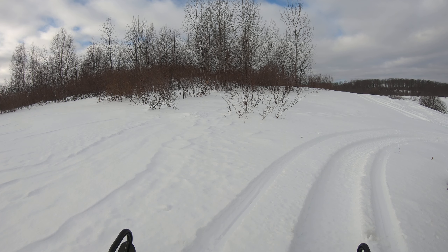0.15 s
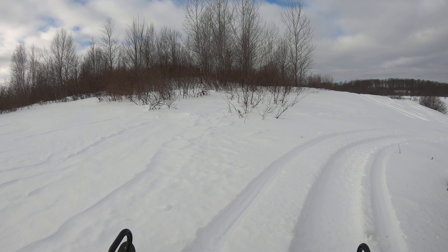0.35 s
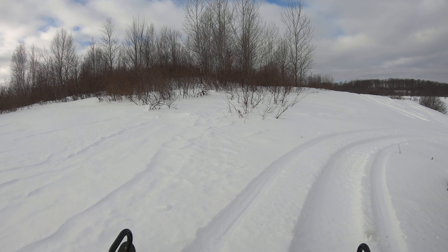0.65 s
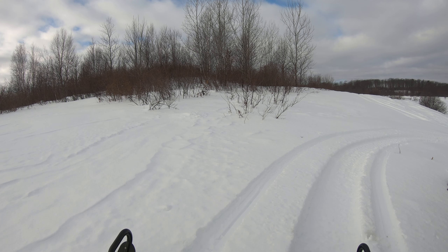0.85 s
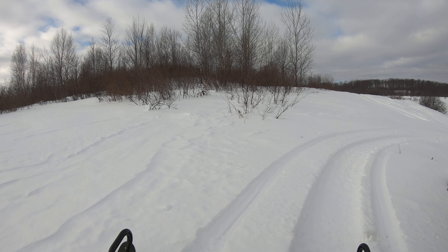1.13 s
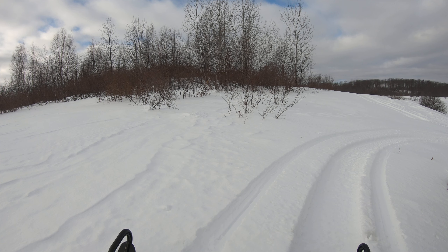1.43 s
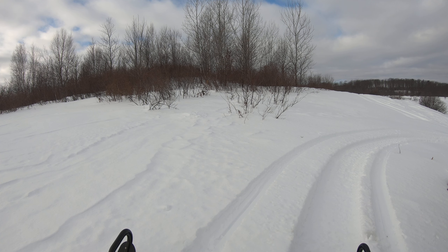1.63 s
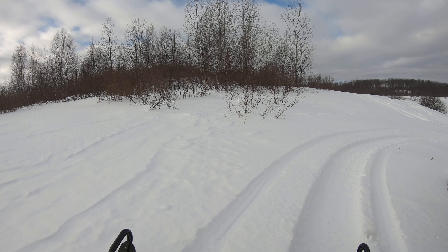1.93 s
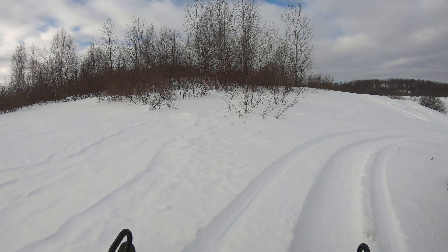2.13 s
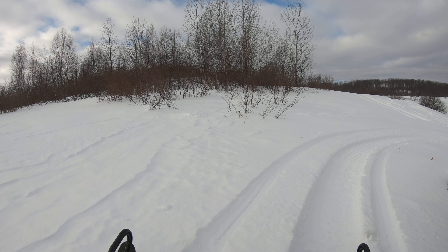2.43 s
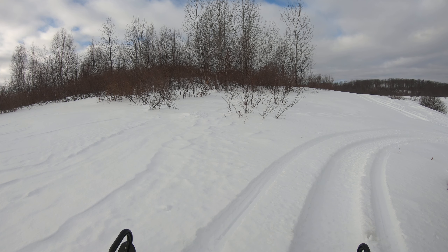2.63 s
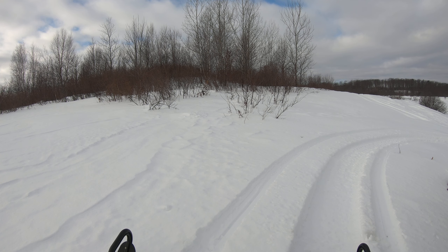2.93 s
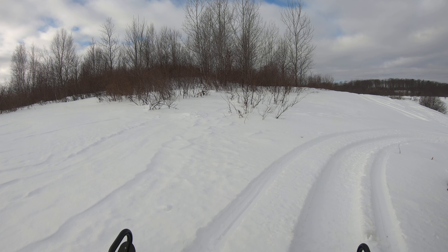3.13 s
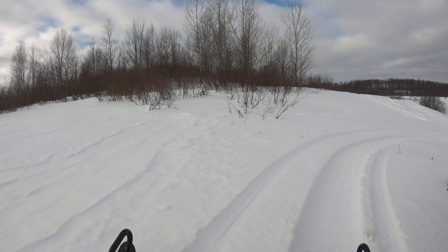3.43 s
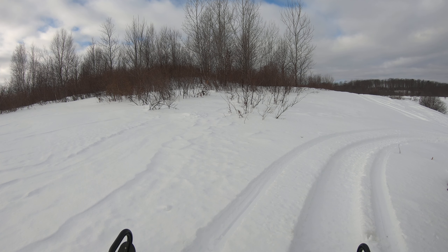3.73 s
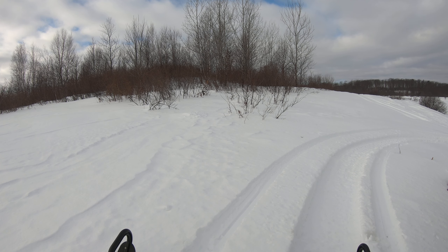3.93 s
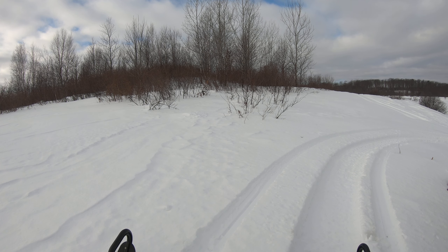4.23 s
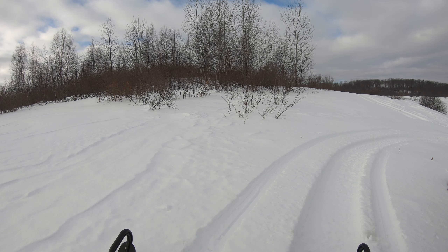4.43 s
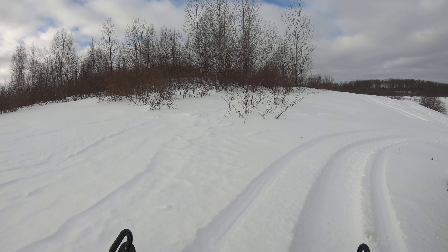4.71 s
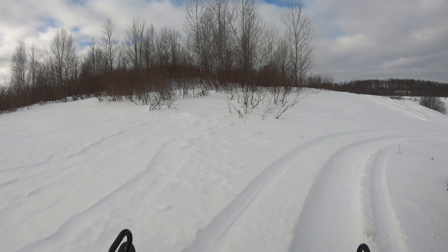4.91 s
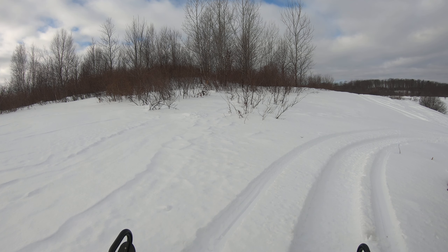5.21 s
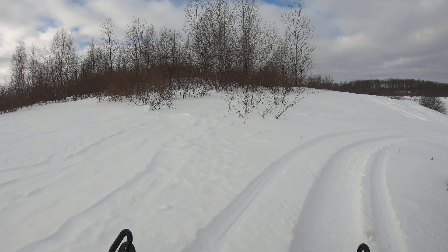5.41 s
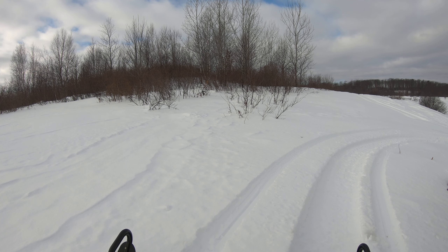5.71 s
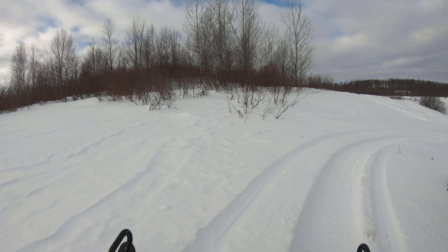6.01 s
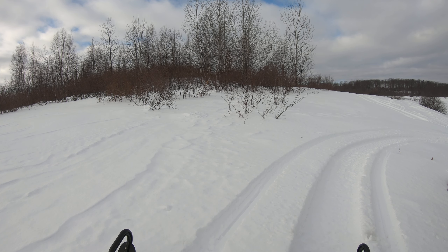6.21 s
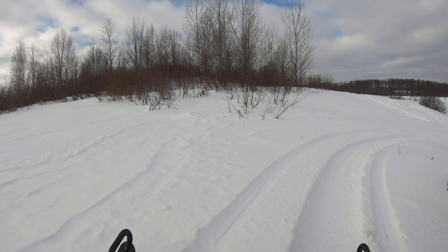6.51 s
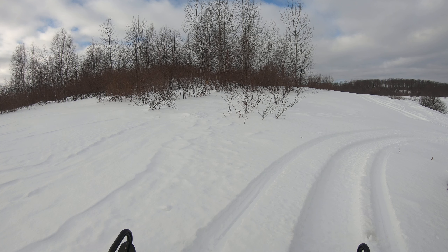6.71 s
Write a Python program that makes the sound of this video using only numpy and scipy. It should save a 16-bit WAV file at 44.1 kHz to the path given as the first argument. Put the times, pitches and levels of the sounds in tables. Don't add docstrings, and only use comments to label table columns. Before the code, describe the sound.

A snowmobile stands idling outdoors on snow, heard from just behind its hood. A low, fast throb pumps continuously, with irregular exhaust booms and a hollow ringing from the silencer. Loose clutch metal knocks and chatters over it, harder at random moments, with tiny bright ticks and soft fan hiss. The speed barely wavers and nothing else happens. The sound is close, dry and slightly muffled.

```python
import sys
import numpy as np
from scipy import signal
from scipy.fft import rfft, irfft
from scipy.io import wavfile
from scipy.ndimage import uniform_filter1d

SR = 44100
rng = np.random.default_rng(int(sys.argv[2]) if len(sys.argv) > 2 else 0)


def master(y):
    cut = np.clip(np.atleast_2d(y).T, -1, 1)
    pcm = np.round(cut * 32767)
    wavfile.write(sys.argv[1], SR, pcm.astype(np.int16))


def elevation(decibels):
    levels = np.asarray(decibels, float)
    return 10 ** (levels / 20)


N = 302570


def level(x, db):
    return x * elevation(db) / np.sqrt(np.mean(x ** 2))


def colour(x, points):
    hz, db = np.transpose(points)
    grid = np.fft.rfftfreq(2048, 1 / SR)
    fall_above = -30 * np.log2(np.maximum(grid / hz[-1], 1))
    fall_below = -12 * np.log2(np.maximum(hz[0] / (grid + 1), 1))
    gain_db = np.interp(np.log(grid + 1), np.log(hz), db) + fall_above + fall_below
    cepstrum = irfft(gain_db * np.log(10) / 20)
    cepstrum[1:1024] *= 2
    cepstrum[1025:] = 0
    return signal.fftconvolve(x, irfft(np.exp(rfft(cepstrum))))[:N]


def ring(x, hz, width_hz):
    return signal.lfilter(*signal.iirpeak(hz, hz / width_hz, fs=SR), x)


def clicks(times_s, sizes):
    out = np.zeros(N)
    inside = (times_s >= 0) & (times_s < (N - 1) / SR)
    np.add.at(out, (times_s[inside] * SR).astype(int), sizes[inside])
    return out


def decaying(impulses, decay_ms):
    return signal.lfilter([1], [1, -np.exp(-1000 / (decay_ms * SR))], impulses)


def bursts(impulses, decay_ms, tail):
    scrape = decaying(impulses, decay_ms) * rng.standard_normal(N)
    return np.roll(impulses, int(.001 * SR)) + tail * scrape


def hump(turn, centre, width):
    away = (turn - centre + .5) % 1 - .5
    return np.exp(-.5 * (away / width) ** 2)


PUMP = [(0.178, 0.049, 0.048), (0.273, 0.033, 0.55), (0.357, 0.02, 0.19), (0.397, 0.013, 0.11),
        (0.482, 0.05, 0.37)]


def pumping(turn):
    steps = np.repeat(rng.standard_normal((2, N // 500 + 1)), 500, axis=1)
    wobble = uniform_filter1d(steps, 500)[:, :N]
    angle = turn + .0071 * wobble[0]
    dips = 0
    for at, width, depth in PUMP:
        dips = dips + depth * (hump(angle, at, width) + hump(angle, at + .5, width))
    return (dips.mean() - dips) * (1 + .06 * wobble[1]) * elevation(1.47)


def ignition(turn, ports_s):
    charge = rng.random(len(ports_s)) ** 1.4
    knock_s, knock_db = np.transpose(KNOCKS)
    knock_turn = np.round(np.interp(knock_s, np.arange(N) / SR, turn)).astype(int)
    before = (2 * knock_turn - 1)[knock_db > -24.5]
    charge[before] = .7 + .3 * charge[before]
    charge = signal.lfilter([1, 0, -.3, 0, -.2], [1], charge)
    return (charge - charge.mean()) / charge.std()


# (delay [ms], width [ms], pressure [linear])
BOOM = [(2.8, .8, 1.0), (5.5, .8, -1.7), (10.1, 1.0, 1.6), (15.0, 1.5, -.8), (18.9, .7, .8),
        (23.8, 1.4, -.2), (32.5, 1.5, .3)]
# (frequency [Hz], width [Hz], level [dB])
CHAMBERS = [(277, 12, -2), (373.3, 21.4, 11.5), (473, 73, -6), (579, 48, -1), (681.4, 15, -2.5),
            (720, 45, -9), (841, 31, -4), (909, 54, -16.5), (1003, 28, -15)]


def exhaust(ports_s, charge):
    ms = np.arange(1800) / SR * 1000
    pipe = sum(p * np.exp(-.5 * ((ms - delay) / width) ** 2) for delay, width, p in BOOM)
    late_s = ports_s + .00018 * rng.standard_normal(len(ports_s))
    boom = signal.fftconvolve(clicks(late_s, charge), pipe)[:N] * elevation(-20)
    cylinder = (-1) ** np.arange(len(ports_s))
    puffs = clicks(late_s + .003976, .97 + .14 * charge + 1.8 * cylinder)
    puffs = bursts(puffs, decay_ms=6.8, tail=.023)
    chambers = 0
    for k, (hz, width_hz, db) in enumerate(CHAMBERS):
        chambers = chambers + (-1) ** k * elevation(db) * ring(ring(puffs, hz, width_hz), hz, 3 * width_hz)
    return boom + level(chambers, -31.5)


# (frequency [Hz], density [dB per Hz])
GAS = [(30, -5), (60, 2.5), (130, -15.5), (230, -3), (330, -3.5), (450, -8.5), (760, -14), (980, -20.5),
       (1150, -23), (1600, -25.5), (2200, -32), (4000, -61.5), (8000, -58.5)]


def gas(turn):
    near = .5 * hump(turn, .28, .08) + .2 * hump(turn, .03, .07)
    far = .4 * hump(turn, .8, .06) + .15 * hump(turn, .6, .04)
    gate = .6 + near + far
    return level(colour(gate * rng.standard_normal(N), GAS), -26.5)


# (time [s], peak level [dB])
KNOCKS = [(0.0882, -22), (0.3666, -23), (0.5846, -21), (0.7068, -23), (1.0156, -20), (1.046, -22),
          (1.1692, -22), (1.2905, -20), (1.3813, -24), (1.5983, -19), (1.6896, -21), (1.7609, -24),
          (1.7804, -21), (1.8113, -23), (1.9959, -22), (2.2697, -21), (2.6329, -24), (2.7247, -21),
          (2.9387, -22), (3.2131, -21), (3.3972, -24), (3.5209, -23), (3.5523, -24), (3.7364, -21),
          (3.8566, -22), (4.4623, -24), (4.588, -20), (4.9232, -24), (5.0484, -24), (5.9933, -24)]
# (time [s], rattle level [dB], crank angle of the knock [turns])
LOOSE = [(0.0, -42, -.15), (2.4, -43, -.07), (3.6, -42, -.13), (4.2, -44.5, -.12), (4.8, -42.5, -.15),
         (5.7, -44, -.16), (6.3, -43.5, -.25), (6.86, -41, -0.23)]


def knocks(turn_s, charge):
    when, loose_db, angle = np.transpose(LOOSE)
    hard_s, hard_db = np.transpose(KNOCKS)
    chance = rng.standard_normal((len(turn_s), 3))
    push = np.minimum(np.r_[0, charge[1::2], 0][:len(turn_s)], 1.6)
    play_db = np.interp(turn_s, when, loose_db - loose_db.mean())
    firm_s = turn_s + np.interp(turn_s, when, angle) / SPEED[0][1] + .0022 * chance[:, 0]
    firm_db = -30.5 + 4.0 * push + play_db
    free = np.abs(firm_s[:, None] - hard_s).min(axis=1) > .007
    back_s = turn_s + .0068 + .0016 * chance[:, 2]
    back_db = -31.5 + 2.6 * np.minimum(chance[:, 1], 1.2) + play_db
    times_s = np.r_[hard_s, firm_s[free], back_s]
    return times_s, np.r_[hard_db + 2.5, firm_db[free], back_db]


# (frequency [Hz], density [dB per Hz])
COWL = [(600, -20.5), (1100, -4), (1600, 0), (2300, -8.5), (2800, -4.5), (3110, -6.5), (3600, -7.5),
        (4000, -14), (4400, -11), (5100, -23), (6000, -34), (7600, -30.5), (9500, -51.5), (11500, -62.5)]


def rattle(turn, turn_s, blows):
    blow_s, blow_db = blows
    hard = bursts(clicks(blow_s + .0003, elevation(blow_db + 30.5)), decay_ms=1.8, tail=.16)
    hard = signal.lfilter(*signal.butter(2, 2230, "high", fs=SR), hard)
    chance = 2 * rng.random((len(turn_s), 6)) - 1
    first = clicks(turn_s - .006 + .003 * chance[:, 0], elevation(-11 + 5 * chance[:, 1]))
    second = clicks(turn_s + .0065 + .002 * chance[:, 2], elevation(-8.5 + 5 * chance[:, 3]))
    third = clicks(turn_s + .022 + .004 * chance[:, 4], elevation(-15 + 5 * chance[:, 5]))
    light = bursts(first + second + third, decay_ms=2.0, tail=.07) * elevation(-2)
    swell = .4 + .4 * hump(turn, .9, .09) + .5 * hump(turn, .25, .07)
    chatter = decaying(clicks(blow_s, elevation(blow_db + 33)), 34.6)
    hiss = swell * rng.standard_normal(N) * (elevation(-33) + elevation(-36) * chatter)
    when, loose_db, _ = np.transpose(LOOSE)
    loose = elevation(np.interp(np.arange(N) / SR, when, loose_db) + 46)
    tap = ring(clicks(turn_s + .0055, elevation(2.5 + 2.4 * chance[:, 1])), 1600, 990)
    cowl = colour(hard + tap + loose * (light + hiss), COWL)
    return level(cowl + 2.14 * ring(cowl, 3150, 170), -38)


# (frequency [Hz], density [dB per Hz])
FAN = [(5200, -3.5), (6200, -11.5), (7500, -5), (8300, -3.5), (9400, -1), (10200, -6.5), (11200, -24),
       (12000, -18.5), (13000, -28.5), (14200, -21), (15200, -37)]


def reed_and_fan(turn, turn_s, blows):
    tick_size = elevation(2.8 * rng.standard_normal(len(turn_s)))
    tick = bursts(clicks(turn_s + .0047, tick_size), decay_ms=1.4, tail=.4)
    blow_s, blow_db = blows
    bright = bursts(clicks(blow_s + .0006, elevation(1.4 * (blow_db + 19))), decay_ms=1.1, tail=.38)
    bright = bright + 2.3 * ring(bright, 12200, 1500)
    swell = .55 + .3 * hump(turn, .13, .15)
    fan = swell * rng.standard_normal(N) * elevation(-18)
    return level(colour(tick + fan + bright, FAN), -61.5)


# (time [s], turns per second [Hz])
SPEED = [(0.0, 32.278), (0.904, 32.582), (1.01, 32.471), (1.254, 33.099), (1.476, 32.339), (2.213, 33.074),
         (2.529, 32.841), (3.08, 32.737), (3.34, 32.254), (3.56, 32.674), (4.023, 33.259), (4.355, 32.509),
         (4.999, 32.421), (5.53, 33.07), (5.878, 32.44), (6.278, 32.288), (6.919, 31.612)]


def scene():
    t = np.arange(N) / SR
    turn = np.cumsum(np.interp(t, *np.transpose(SPEED))) / SR
    turn_s = np.interp(np.arange(int(turn[-1]) + 1), turn, t)
    ports_s = np.interp(np.arange(.125, turn[-1], .5), turn, t)
    charge = ignition(turn, ports_s)
    engine = pumping(turn) + exhaust(ports_s, charge) + gas(turn)
    blows = knocks(turn_s, charge)
    return (engine + rattle(turn, turn_s, blows) + reed_and_fan(turn, turn_s, blows))[None]


def band_limit(x):
    return signal.sosfilt(signal.butter(12, 15330, fs=SR, output="sos"), x)


def record(dry):
    thin = signal.sosfilt(signal.butter(1, 12, "high", fs=SR, output="sos"), dry - dry.mean())
    thin = np.tanh(.6 * thin) / .6
    thin = signal.sosfilt(signal.butter(12, 14950, fs=SR, output="sos"), thin)
    mix = thin + .0035
    return band_limit(mix)


dry = scene()
out = record(dry)
master(out)
```